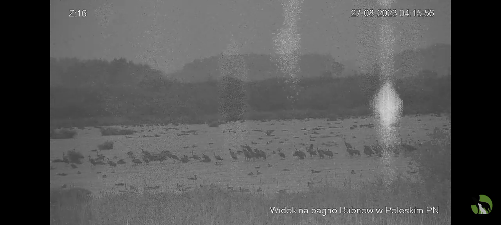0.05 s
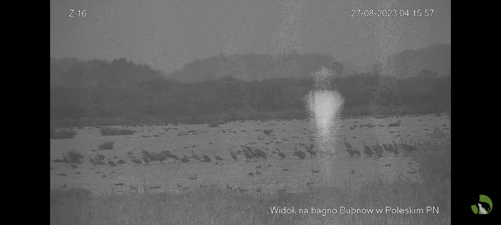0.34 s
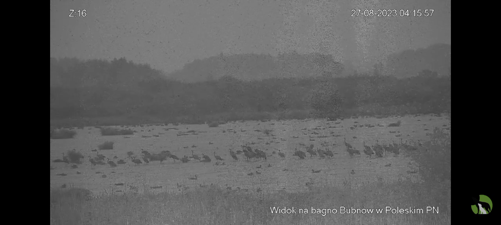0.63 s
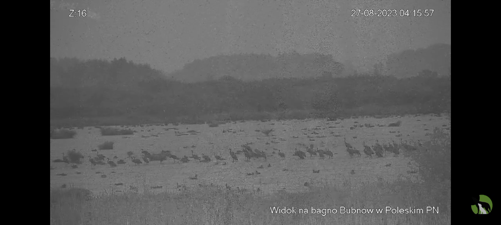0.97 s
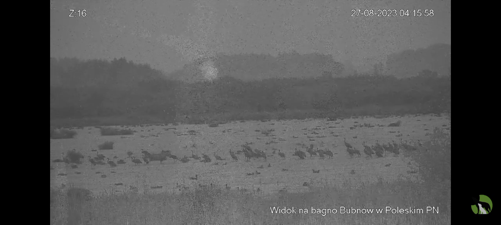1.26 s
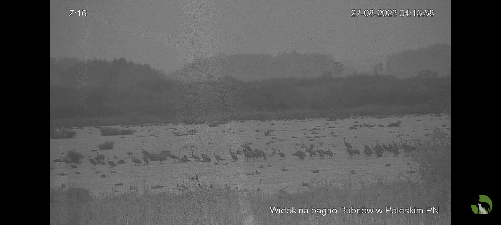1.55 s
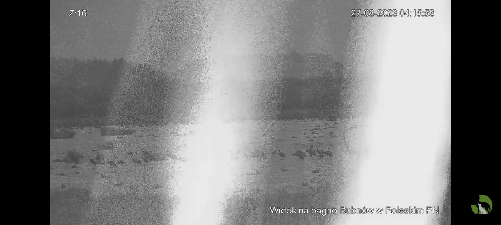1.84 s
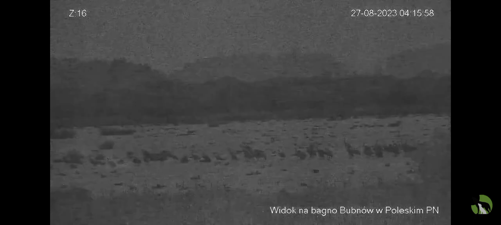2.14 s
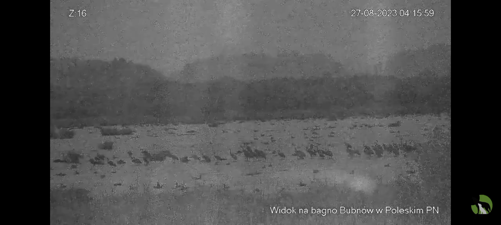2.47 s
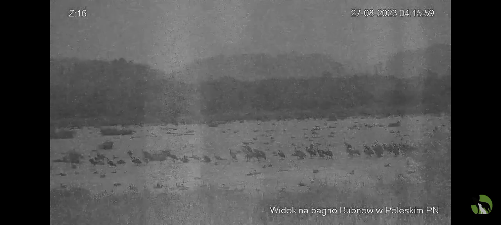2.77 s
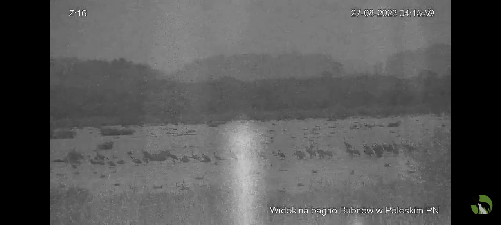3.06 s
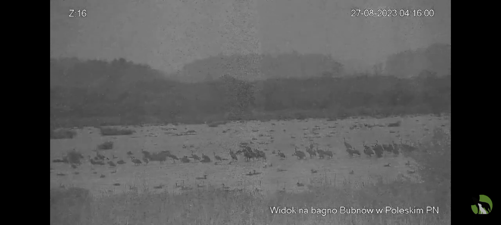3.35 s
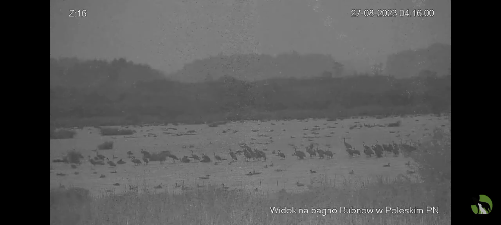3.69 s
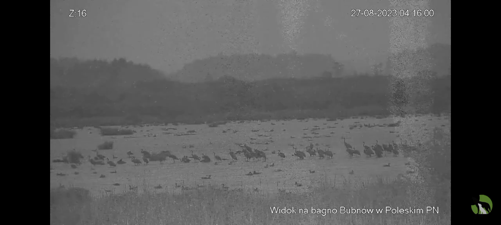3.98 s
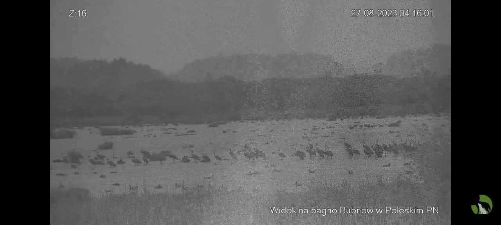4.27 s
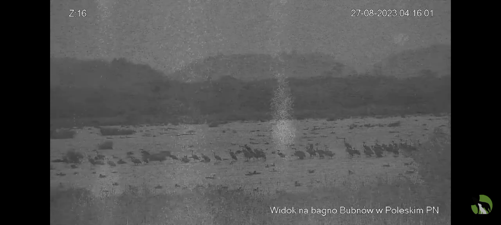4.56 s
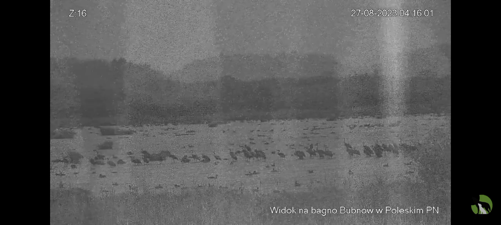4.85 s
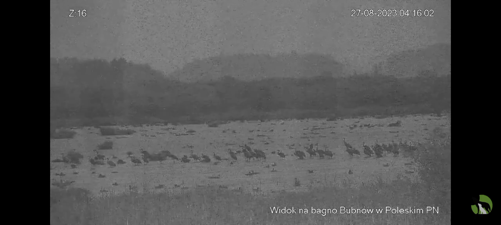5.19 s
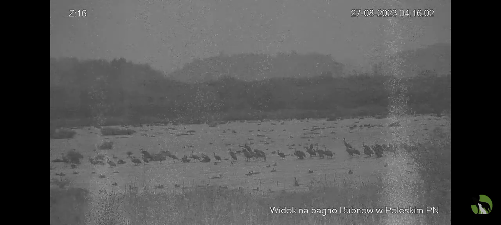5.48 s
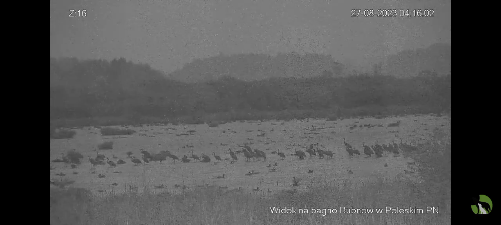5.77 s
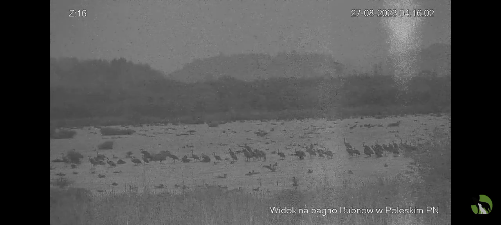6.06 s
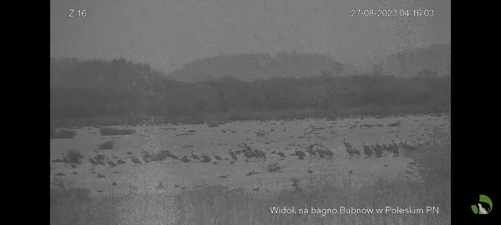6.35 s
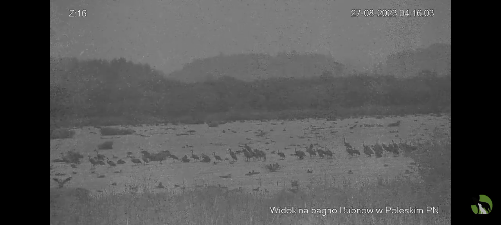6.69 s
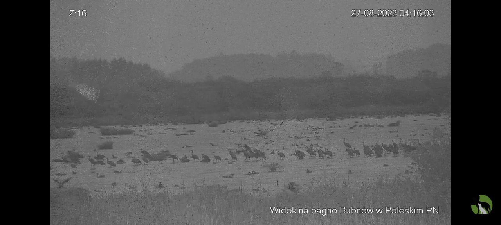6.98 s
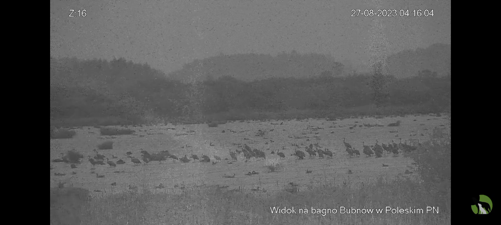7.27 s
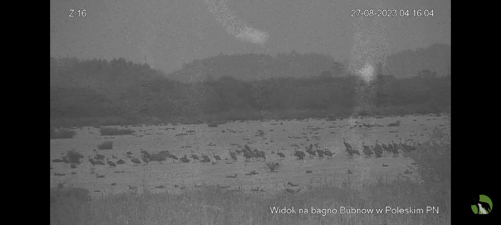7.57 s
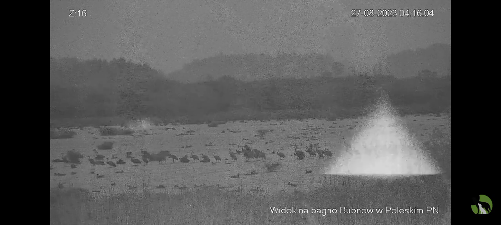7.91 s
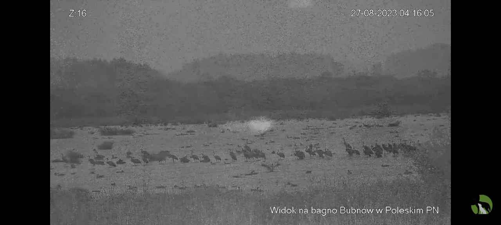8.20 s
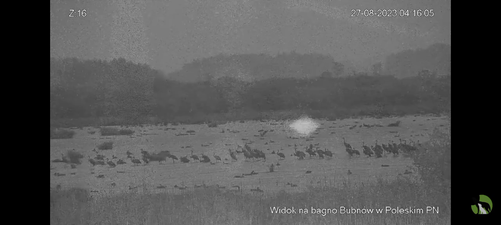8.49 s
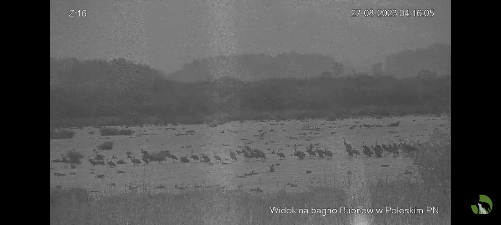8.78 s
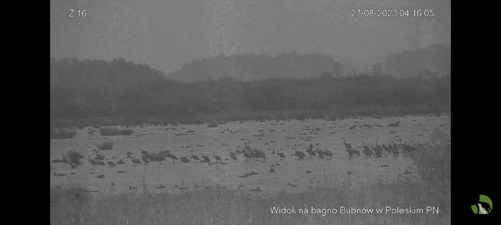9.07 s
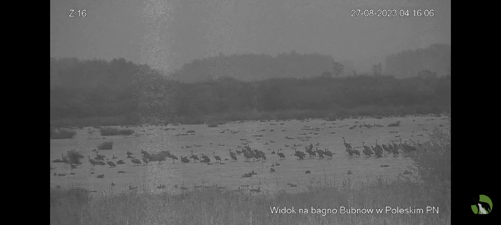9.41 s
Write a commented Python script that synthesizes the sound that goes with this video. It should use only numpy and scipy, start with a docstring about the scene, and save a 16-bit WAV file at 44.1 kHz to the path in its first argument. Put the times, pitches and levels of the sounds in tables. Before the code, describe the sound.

Large raindrops hit the housing of an outdoor camera right beside the microphone, each a sharp tap with a brief hollow knock. They fall irregularly, hardest and most frequent in the first half, then lighter, with two more hard hits later. Tiny drops patter in between. Behind them are a soft hiss of rain over a marsh, a low rumble of air and a few very faint, distant bird calls.

```python
"""Large raindrops hit the shell of an outdoor camera, right by its microphone; the hardest overload it.
Each drop gives the shell a short push, and it rings for a few hundredths of a second.
Small drops patter in between and dripping water makes soft, low plops. Behind them are the hiss
of soft rain over a marsh, a low rumble of air, a faint fan hum and a few far bird calls."""
import sys
import numpy as np
from scipy import signal
from scipy.fft import rfft, irfft
from scipy.io import wavfile
from scipy.ndimage import uniform_filter1d

SR = 44100
rng = np.random.default_rng(int(sys.argv[2]) if len(sys.argv) > 2 else 0)


def wrap_up_sound(samples):
    """Save the sound to the file named by the first command line argument, as 16-bit audio."""
    columns = np.atleast_2d(samples).T
    # keep every value between -1 and 1, then stretch to whole-number steps
    tamed = np.clip(columns, -1, 1)
    steps = np.round(tamed * 32767).astype(np.int16)
    wavfile.write(sys.argv[1], SR, steps)


N = 420710


def gain_of(db):
    """Turns decibels into a number to multiply a sound by."""
    return 10 ** (np.asarray(db) / 20)


def unit_level(x):
    """Scales a signal so that its average size (rms) is 1."""
    return x / np.sqrt(np.mean(x ** 2) + 1e-20)


def add(mix, start_s, sound):
    """Adds a sound to the mix at its start time."""
    part = mix[max(round(start_s * SR), 0):][:len(sound)]
    part += sound[:len(part)]


def drift(rate_hz):
    """A smooth random wobble, mostly slower than rate_hz."""
    hz = np.fft.rfftfreq(N, 1 / SR)
    return unit_level(irfft(rfft(rng.standard_normal(N)) / (1 + (hz / rate_hz) ** 4), N))


def marsh_rain_and_air(level_db=-46, patch_db=2.5, gust_db=0.5, air_below_hz=130):
    """Countless far drops blend into a patchy hiss; below it, moving air rumbles unevenly."""
    # how strong the rain and air are from low to high: pitch_hz, relative_db
    tone_shape = [(10, 1.5), (28, 0), (60, -5.5), (100, -7), (180, -15), (400, -15), (600, -19),
                  (1150, -15.5), (1600, -21.5), (2100, -28.5), (3200, -32), (4700, -32.5), (6000, -39.5),
                  (7200, -44)]
    # how the rumble rises and falls: time_s, relative_db
    rumble_curve = [(0.0, -52), (2.05, -54), (2.68, -49), (3.37, -55), (6.88, -59), (7.44, -47),
                    (8.66, -60.5), (9.54, -52)]
    frames, hz = N // 512 + 5, np.fft.rfftfreq(2048, 1 / SR)
    # noise on a grid of short time slices by pitches
    real, imag, patches = rng.standard_normal((3, frames, len(hz)))
    patches = uniform_filter1d(patches, size=10, axis=0)
    patches = unit_level(uniform_filter1d(patches, size=8, axis=1))
    gusts = unit_level(uniform_filter1d(rng.standard_normal(frames), size=12))
    rumble_db = np.interp(np.linspace(0, N / SR, frames), *np.transpose(rumble_curve))
    swell_db = gust_db * gusts + (rumble_db - rumble_db.mean())
    air_db = swell_db[:, None] / (1 + (hz / air_below_hz) ** 2)
    shape_hz, shape_db = np.transpose(tone_shape)
    steady_db = np.interp(np.log(hz + 1), np.log(shape_hz), shape_db)
    grid = (real + 1j * imag) * gain_of(steady_db + patch_db * patches + air_db)
    hiss = signal.istft(grid.T, nperseg=2048, noverlap=1536)[1][:N]
    return gain_of(level_db) * unit_level(hiss)


def fan_hum(waver=0.0038):
    """A fan hums two faint tones that waver slightly together."""
    # the fan's tones: pitch_hz, level_db
    tones = [(525, -67), (601, -65)]
    wavering_time = np.cumsum(1 + waver * drift(rate_hz=6.6)) / SR
    return sum(gain_of(db) * np.sqrt(2) * np.sin(2 * np.pi * hz * wavering_time) for hz, db in tones)


def drop_on_shell(force_db, contact_ms, boom_db, knock_db, panel_hz, edge_echo_ms):
    """One drop pushes the shell and splashes; where it lands decides which tones ring."""
    # the shell's natural tones: pitch_hz, level_db, ring_s (time to fade by 60 dB), rise_s
    shell_tones = [(93.8, -21.5, 0.11, 0), (180.1, -2.5, 0.066, 0.043), (194, -11.5, 0.063, 0.0018),
                   (246, -4.5, 0.022, 0.0013), (328, -6.5, 0.021, 0.00012), (368.2, -10, 0.037, 0.0022),
                   (470, -17, 0.041, 0.0), (631.3, -8, 0.026, 0.0025), (742, -10, 0.02, 0.0016),
                   (819, -8, 0.021, 0.00011), (982, 1.5, 0.011, 0.0011), (1288, -1.5, 0.017, 0.0012),
                   (1592, 1, 0.01, 0.00045), (2025, -15.5, 0.022, 0.0036), (2477, -12.5, 0.016, 0.0013),
                   (3126, -8.5, 0.017, 0.00028), (4640, -16, 0.021, 0.0038), (5300, -30, 0.012, 0.0)]
    # centres of the sway, boom, knock and upper ring: pitch_hz
    band_centres = [90, 175, 370, 650]
    t = np.arange(SR // 6) / SR
    hz, level_db, ring_s, rise_s = np.transpose(shell_tones)[:, :, None]
    # a blow that makes the shell boom also rocks its mount, more so when it is heavy
    sway_db = boom_db + 0.4 * (force_db + boom_db)
    bands = np.log(band_centres), [sway_db, boom_db, knock_db, 0]
    fade = gain_of(level_db + np.interp(np.log(hz), *bands) - 60 * t / ring_s)
    # a wave bounces back from the edge, feeding some tones and starving others
    edge_gain = 1 + 0.7 * np.cos(2 * np.pi * hz * edge_echo_ms / 1000)
    build_up = 1 - np.exp(-(t + 1 / SR) / np.maximum(rise_s, 1e-6))
    shell = (edge_gain * build_up * fade * np.cos(2 * np.pi * hz * t)).sum(0)
    # the struck panel fades in a cycle or two; smaller, higher panels answer more strongly
    panel_fade_s = min(1.54 / panel_hz, 0.0092)
    panel_db = 4 + 5 * np.log2(panel_hz / 800) + np.interp(np.log(panel_hz), *bands)
    panel = gain_of(panel_db) * np.cos(2 * np.pi * panel_hz * t) * np.exp(-t / panel_fade_s)
    # the push swells, then fades as the drop flattens: a longer contact sounds duller
    progress = t * 1000 / max(contact_ms, .02)
    push = progress ** 3 * np.exp(-2 * progress)
    ring = signal.fftconvolve(shell + panel, push / push.sum())[:len(t)]
    # the water bursts into a soft spray, which grows a little more slowly than the force
    spray_db = -15 - 0.07 * force_db
    spray_top_hz, spray_rise_s, spray_fade_s = 3600, 0.0019, 0.0034
    noise = signal.lfilter(*signal.butter(1, spray_top_hz, fs=SR), rng.standard_normal(len(t)))
    spray = gain_of(spray_db) * noise * (1 - np.exp(-t / spray_rise_s)) * np.exp(-t / spray_fade_s)
    return gain_of(force_db) * (spray - ring)


def small_drops(count=70):
    """Small drops patter on the shell at random times and places."""
    out = np.zeros(N)
    for when, size, softness, knock, panel, edge in rng.random((count, 6)):
        tap = drop_on_shell(force_db=-48 + 5 * size ** 2, contact_ms=0.09 * (.5 + softness),
                            boom_db=-4, knock_db=10 * knock,
                            panel_hz=300 * 5 ** panel, edge_echo_ms=3 * edge)
        add(out, when * N / SR, tap)
    return out


def big_drops():
    """Larger drops hit the shell, each with its own clear tap."""
    # the hits: start_s, force_db, contact_ms, boom_db, knock_db, panel_hz, edge_echo_ms
    hits = [(0.6871, -5, .06, 7.5, 10.5, 588, .35), (1.0854, -1, 0.043, 10.5, 10, 864, 3.36),
            (1.264, -8, 0.098, 4, 22, 980, 1.16), (1.4003, -2.5, .16, 2, 15, 1050, 1.06),
            (1.6031, -6, 0.1, 4, -3, 2160, 2.81), (1.783, -20, .14, 10, 2, 4160, 1.39),
            (1.9324, -8.5, 0.11, -0.5, -1.5, 790, .76), (2.154, -34.5, 0.075, 1, -2, 680, 2.28),
            (2.3402, -30.5, 0.14, -5, -2.5, 378, 1.68), (2.574, 0, 0.087, 3, 7, 846, .8),
            (2.684, -25, .18, -12, 1.5, 610, 2.9), (3.0182, -10, 0.28, -7.5, -14, 1630, 1.03),
            (3.033, -7, 0.36, 1.5, -11, 560, 1.04), (3.042, -8, 0.18, 1, -2, 2260, .26),
            (3.406, 0, 0.074, 9.5, 13.5, 1370, 3.5), (3.932, 3.5, 0.14, 6, -0.5, 635, 2.7),
            (4.1269, -17.5, 0.16, -1, -9.5, 1740, 2.47), (4.335, -15.5, 0.11, -6, -6.5, 645, 1.58),
            (4.3521, -21, 0.15, 14.5, 20.5, 625, 1.27), (4.37, -7.5, .22, 3, 4.5, 152, .83),
            (4.8465, -23, 0.068, 7, 5, 780, 1.71), (4.9778, -15.5, .15, 11.5, 4, 3500, 2.06),
            (5.0526, -33.5, 0.078, -6, -7, 624, 3.4), (5.8771, -30.5, .075, -18, -11, 2450, .75),
            (6.727, -27, 0.14, -12, -4, 470, 2.82), (6.799, -43.5, .062, -2, 9, 1640, 1.9),
            (6.8714, -32, 0.14, 9, -2, 297, 2.43), (7.0737, -19, 0.085, -16, -29, 2500, .77),
            (7.2174, -24.5, 0.086, 15, 13, 724, 1.9), (7.3955, -0.5, 0.12, 8, 0, 139.4, 3.37),
            (7.7642, -2, .12, 7, 8.5, 910, 3.42), (8.0007, -36.5, 0.028, 2, 7, 2770, 3.4),
            (8.6417, -24.5, 0.23, -4.5, -16, 245, 1.26), (8.833, -29.5, 0.042, 13.5, -3, 680, 3.4),
            (8.94, -28, 0.032, -3.5, 1, 520, .8), (9.186, -34.5, 0.024, -9, -17, 2250, 2.15),
            (9.3117, -20.5, 0.15, 7, -3, 4100, 2.39), (9.507, -29.5, .063, -4, -7, 544, 2.38)]
    out = np.zeros(N)
    for start_s, *blow in hits:
        add(out, start_s, drop_on_shell(*blow))
    return out


def drip_plops(pitch_hz=256.5, pitch_spread=0.033, swell_s=0.0098):
    """Each drip of water sounds one low tone that quickly swells and dies away."""
    # the drips: start_s, level_db
    drips = [(0.871, -51), (4.723, -42), (5.222, -42.5), (6.726, -39.5), (8.004, -35)]
    out, t = np.zeros(N), np.arange(SR // 8) / SR
    swell = t / swell_s * np.exp(1 - t / swell_s)
    for start_s, level_db in drips:
        hz = pitch_hz * (1 + pitch_spread * rng.uniform(-1, 1))
        add(out, start_s, gain_of(level_db) * swell * np.sin(2 * np.pi * hz * t))
    return out


def far_birds(blur_hz=45, flock_calls=6, flock_hz=1168, pitch_spread=0.092, call_s=0.18, flock_db=-65):
    """Distance and echoes blur each bird call into a soft whistle."""
    # the clearest calls: start_s, length_s, pitch_hz, level_db
    clear_calls = [(1.66, 0.13, 1360, -54.5), (2.66, 0.34, 1324, -55), (3.47, 0.13, 1290, -56.5),
                   (5.42, 0.28, 1545, -58), (5.9, 0.062, 1024, -56)]
    out = np.zeros(N)
    blur = drift(blur_hz) + 1j * drift(blur_hz)  # wobbles both loudness and pitch
    # the rest of the flock calls faintly, at random times and near one pitch
    faint_calls = [(when * (N / SR - call_s), call_s, flock_hz * (1 + pitch_spread * (pitch - .5)),
                    flock_db) for when, pitch in rng.random((flock_calls, 2))]
    for start_s, length_s, pitch_hz, level_db in list(clear_calls) + faint_calls:
        t = np.arange(int(length_s * SR)) / SR
        wobble = blur[round(start_s * SR):][:len(t)]
        whistle = unit_level((wobble * np.exp(2j * np.pi * pitch_hz * t)).real)
        add(out, start_s, gain_of(level_db) * whistle * signal.windows.tukey(len(t), .5))
    return out


def scene():
    """All the sounds add up at the one microphone."""
    near_water = big_drops() + small_drops() + drip_plops()
    return (near_water + marsh_rain_and_air() + fan_hum() + far_birds())[None]


def record(dry, ceiling=.48, hardness=6, top_hz=7100):
    """The overloaded microphone input flattens the hardest taps; then the highest treble is cut."""
    flattened = dry / (1 + (abs(dry) / ceiling) ** hardness) ** (1 / hardness)
    treble_cut = signal.firwin(301, top_hz, window=("kaiser", 8), fs=SR)
    return signal.oaconvolve(flattened, treble_cut[None], "same")


dry = scene()
out = record(dry)
wrap_up_sound(out)
```